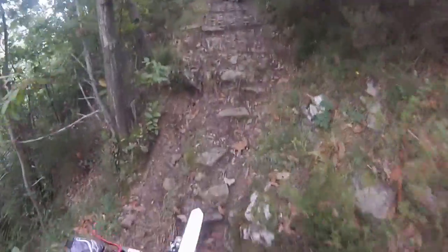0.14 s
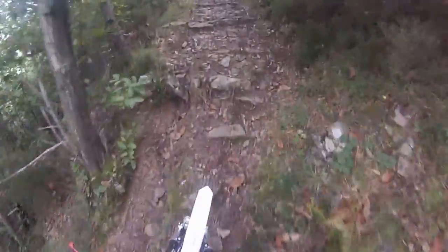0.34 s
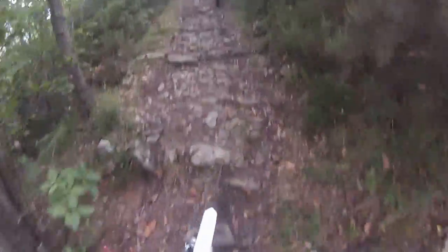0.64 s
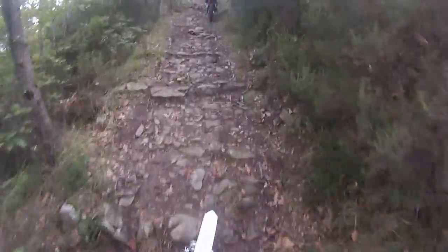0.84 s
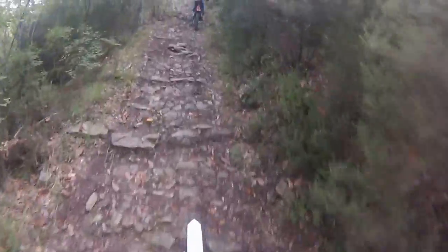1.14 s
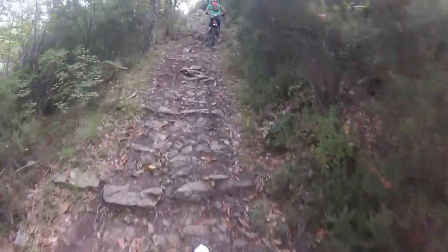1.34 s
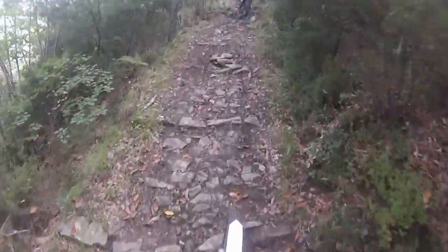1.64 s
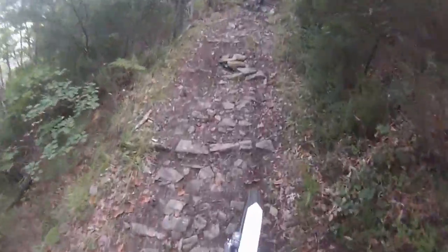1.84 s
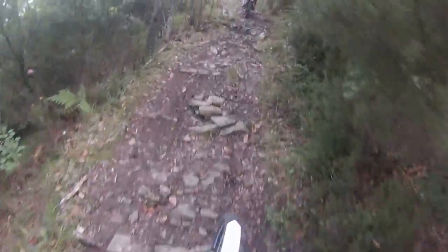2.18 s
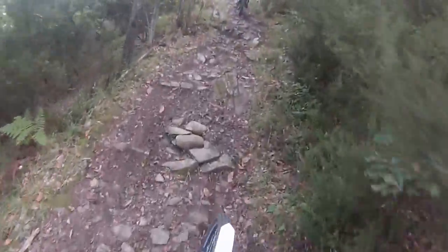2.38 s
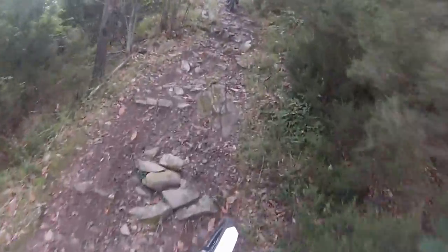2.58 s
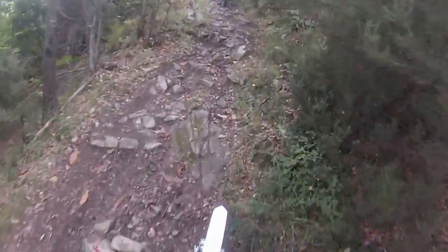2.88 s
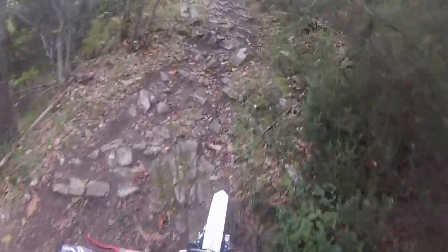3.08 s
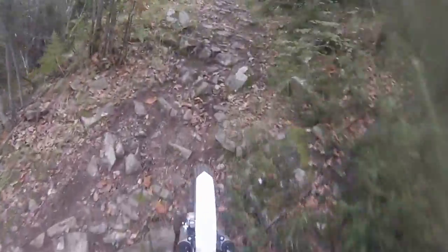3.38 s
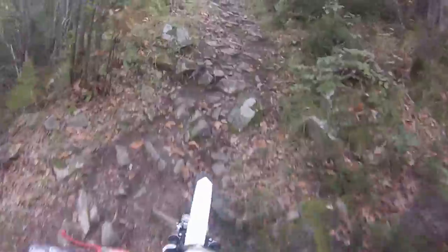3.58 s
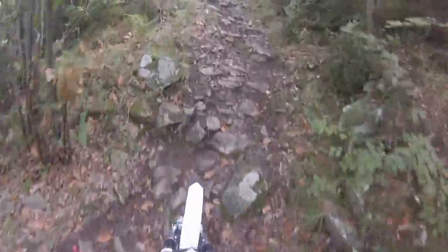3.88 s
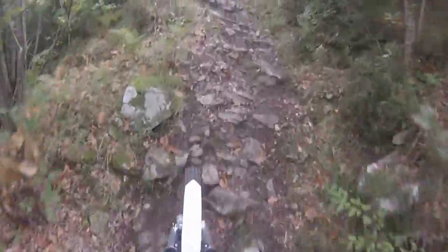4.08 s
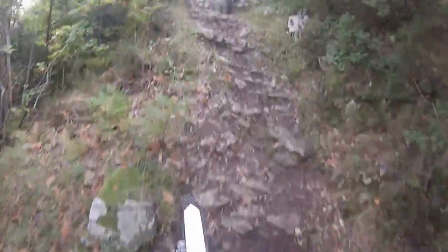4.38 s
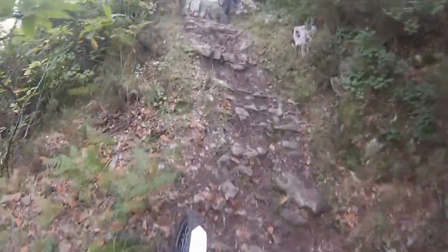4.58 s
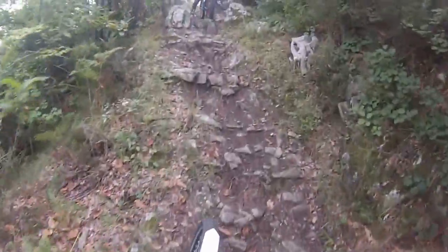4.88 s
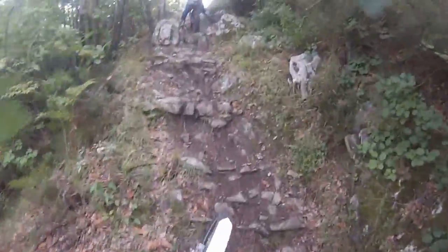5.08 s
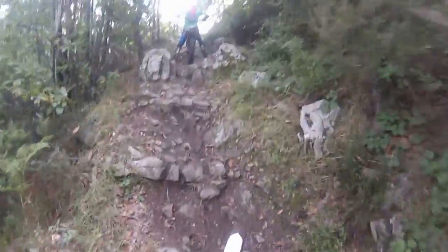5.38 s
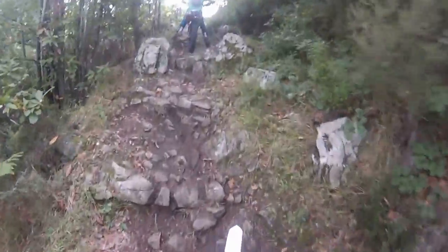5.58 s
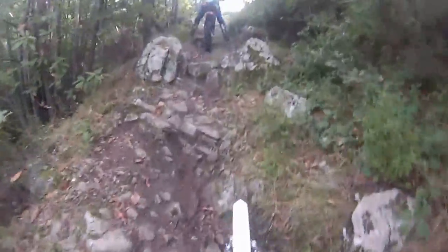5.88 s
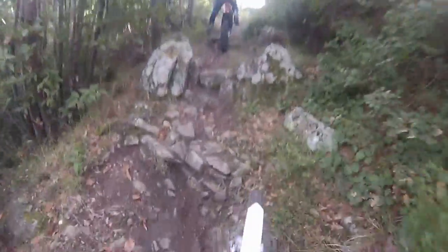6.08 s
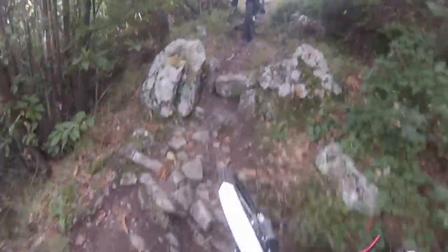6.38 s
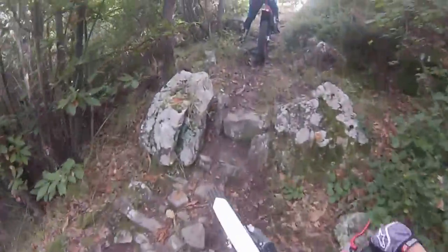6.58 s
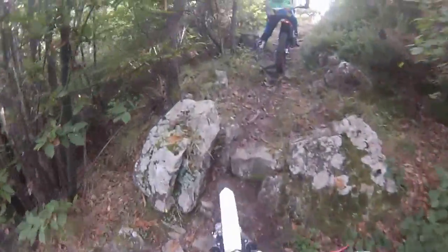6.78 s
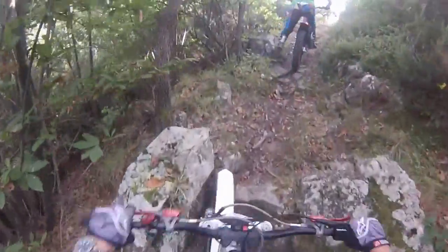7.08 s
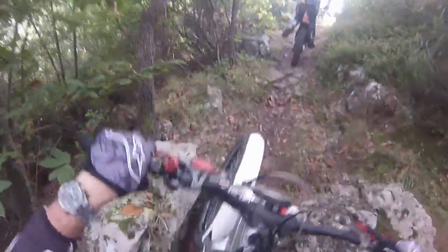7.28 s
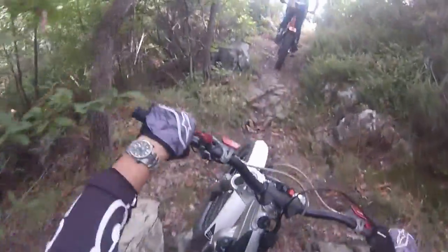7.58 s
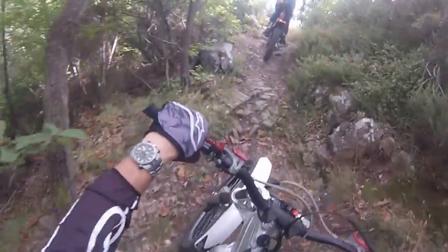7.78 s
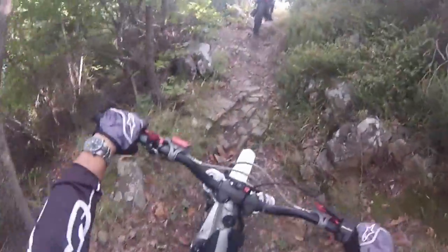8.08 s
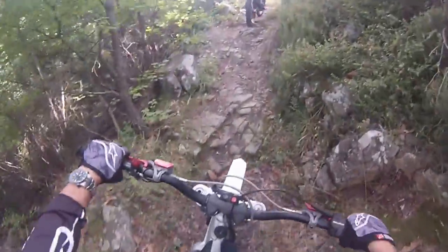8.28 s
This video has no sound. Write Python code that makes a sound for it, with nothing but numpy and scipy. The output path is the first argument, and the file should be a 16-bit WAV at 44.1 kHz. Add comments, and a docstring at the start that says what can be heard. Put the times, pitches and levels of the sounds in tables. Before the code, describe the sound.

An electric bike jolts over a rocky trail with irregular clacks and dull thumps, over a faint motor whine and crunching grit.

```python
"""Hard clacks and dull thumps come first: an electric bike jolts along a rocky forest trail, heard from a
camera in a case on the rider's helmet. Each impact excites damped modes: at a big rock the tyre bumps,
then the bike clacks and the camera mount thuds and sways on; small stones only knock. Stick-slip friction
makes twigs scrape the case and rubber squeak once. The drive whines, hums and ticks in step with its
shaft, while grit crunches and dry leaves hiss under the tyres."""
import sys
import numpy as np
from scipy import signal
from scipy.fft import rfft, irfft
from scipy.io import wavfile
from scipy.ndimage import uniform_filter1d

SR = 44100
rng = np.random.default_rng(int(sys.argv[2]) if len(sys.argv) > 2 else 0)


def persist_wave(psi):
    """Save psi, clipped to +-1, as 16-bit WAV."""
    counts = np.round(np.clip(psi, -1, 1) * 32767).astype(np.int16)
    wavfile.write(sys.argv[1], SR, np.atleast_2d(counts).T)


N = 372204
TIME = np.arange(N) / SR

# Big rocks. Each row: start in seconds, clack level, extra crack and thud level in dB, thud pitch in Hz,
# lead of the tyre bump in seconds, bump level in dB.
BIG_ROCKS = [(0.0946, -27, 4, -18, 144.5, 0.04, -29), (0.2407, -21.5, -28, -16.5, 146, 0.069, -25),
             (0.799, -40.5, -16, -34.5, 143.1, 0.039, -39), (1.2308, -30.5, -21, -22, 124, 0.015, -32),
             (1.8219, -31, -4, -29.5, 133.2, 0.084, -35), (3.4077, -21, -7, -24.5, 141, 0.0081, -33),
             (4.005, -24, -13, -17, 148.1, .04, -22.5), (5.166, -16, -2, -13.5, 146.3, .01, -25.5),
             (5.2855, -31.5, 1, -19.5, 145, .03, -32.5), (5.8345, -23.5, -11, -20.5, 153.3, 0.041, -23.5),
             (5.9882, -29, 0, -19, 148.6, 0.049, -26), (6.1488, -23, -25, -17, 149, 0.049, -19.5),
             (6.5506, -36.5, -20, -25, 120.2, .048, -26), (6.7676, -25.5, -15, -17.5, 132.1, 0.026, -27),
             (7.3212, -21.5, -6, -17.5, 147.1, .03, -27.5), (7.5721, -33.5, -22, -22.5, 119, 0.021, -24),
             (7.6859, -26, 3.5, -19.5, 142.7, .067, -35), (8.1763, -24, -21, -18.5, 140.3, 0.028, -25)]
# Small stones and loose parts. Each row: start in seconds, clack level, extra crack and thud level in dB.
SMALL_KNOCKS = [(0.0834, -31, -30, -36), (0.619, -40.5, -8, -70), (0.7542, -32, -20, -38),
                (1.1646, -25, -12, -35), (1.2146, -21, -24, -45), (1.654, -41.5, -3, -36),
                (2.047, -43.5, -7, -36.5), (3.2605, -33.5, -12, -40), (3.9944, -31.5, -17, -44),
                (4.801, -37.5, -21, -39), (4.9753, -40, 4, -31), (5.1582, -36, -24, -62),
                (5.7846, -33.5, 8, -30.5), (5.942, -32, 4.5, -47), (6.0907, -38.5, -18, -26.5),
                (6.182, -36.5, -19, -27), (6.376, -44, -13, -29), (6.5236, -32.5, -3, -57),
                (6.591, -32.5, -24, -30.5), (6.915, -39.5, -14, -34), (7.1906, -35.5, -23, -33.5),
                (7.44, -52, -18, -32.5), (7.5397, -30.5, -6, -33), (7.619, -31, -3, -40),
                (8.118, -35.5, -27, -44), (8.2909, -37, -17, -40.5), (8.3635, -42, -21, -35),
                (8.4144, -29, -24, -38)]
# Modes of the bike's hard parts. Each row: frequency in Hz, 60 dB decay time in seconds, level in dB.
BIKE_MODES = [(371, 0.032, -5.5), (561, 0.022, -4.5), (717, 0.0094, 1), (1206, 0.022, -1),
              (1353, 0.02, 4.5), (1475, 0.053, -4.5), (2110, 0.012, 10.5), (2300, 0.011, 15.5),
              (2390, 0.022, 6.5), (3095, .012, -3), (3660, 0.01, -1), (3630, 0.016, -14),
              (5400, .01, -18.5), (6600, .01, -27.5)]
# Modes of the mount. Each row: multiple of the thud pitch, 60 dB decay time in seconds, level in dB.
MOUNT_MODES = [(0.479, 0.045, -17), (.78, 0.14, -11.5), (1.026, 0.12, 3.5), (1.218, 0.018, -35.5),
               (1.85, 0.11, -15.5)]
# Sway of helmet and camera. Each row: frequency in Hz, 60 dB decay time in seconds, level in dB.
HELMET_MODES = [(36.84, 0.31, 0.5), (60, 0.16, -13.5)]
# Passing twigs. Each row: start and length in seconds, level in dB, relative ring of the case in dB,
# treble tilt in dB per octave, resonance of the twig in Hz.
TWIG_SCRAPES = [(2.424, 0.034, -43.5, 8, -6.5, 1570), (3.391, 0.021, -26.5, 8, 3.5, 2380),
                (3.414, 0.054, -29.5, -26, -1.5, 2100), (5.209, 0.013, -34.5, -3, -4, 2300),
                (5.255, 0.0008, -27, -23, -4.5, 3050), (5.2798, 0.0029, -32, -1, -12, 1598)]
# Spectrum of a scrape. Each row: frequency in Hz, gain in dB.
SCRAPE_SPECTRUM = [(300, -8), (800, -7), (1500, -3.5), (2900, -1.5), (3600, -2.5), (5200, -0.5),
                   (7000, -2.5), (9000, -7), (12000, -6), (15000, -16)]
# Modes of the camera case. Each row: frequency in Hz, 60 dB decay time in seconds, level in dB.
CASE_WALL_MODES = [(1490, 0.022, 4.5), (2280, 0.017, -24), (2330, 0.015, 5.5), (2980, 0.012, -18),
                   (6150, .05, -31), (6100, 0.005, -9), (6660, 0.024, -2)]
# Loudness of the ground under the tyres. Each row: time in seconds, level in dB.
GROUND_LEVEL = [(0, -59), (.23, -52.5), (.48, -65.5), (.78, -54.5), (1.05, -59), (2.2, -58.5), (2.5, -56.5),
                (2.8, -58), (4.2, -56.5), (4.48, -62), (5.13, -57), (5.42, -67.5), (5.52, -58), (5.8, -58),
                (6.7, -58.5), (6.95, -63.5), (7.27, -55.5), (7.6, -61), (8.12, -51.5), (8.44, -59)]
# Spectrum of the mount's rumble. Each row: frequency in Hz, gain in dB.
RUMBLE_SPECTRUM = [(45, -20), (75, -16), (110, -5.5), (148, 5), (190, -8.5), (260, -4.5), (320, -8),
                   (420, -22), (700, -54)]
# Spectrum of grit and drive ticks. Each row: frequency in Hz, gain in dB.
CRUNCH_SPECTRUM = [(200, -3.5), (380, 1.5), (600, 1), (800, -1.5), (1100, 2.5), (1350, 2), (1570, 5.5),
                   (1850, -8), (2350, 1.5), (2700, -10.5), (3200, -18.5), (4200, -22.5), (7000, -22.5),
                   (15000, -49)]
# Speed of the drive. Each row: time in seconds, shaft turns per second.
SHAFT_SPEED = [(0, 47), (.36, 49.1), (.58, 41.8), (.85, 51), (1.1, 40), (1.4, 38.2), (1.7, 45.8),
               (2.05, 37), (2.33, 41.9), (2.65, 38.2), (2.85, 44.8), (3.1, 48), (3.5, 36.1), (3.85, 43.6),
               (4.25, 42.6), (4.6, 35.5), (5.06, 45.1), (5.38, 30), (5.75, 37.4), (6.5, 33.2), (6.95, 28),
               (7.27, 33.8), (7.5, 30), (7.92, 43.2), (8.44, 37)]
# Transmission through the motor housing. Each row: frequency in Hz, gain in dB.
HOUSING_RESPONSE = [(650, -7), (850, -6.5), (1000, -2.5), (1130, 0), (1400, -3), (1600, -1.5),
                    (1900, -10.5), (2800, -21.5), (3700, -19), (4900, -26.5)]
# Spectrum of dry leaves. Each row: frequency in Hz, gain in dB.
LEAF_SPECTRUM = [(1500, 4), (3000, 6), (3900, -1), (4600, -2.5), (5350, 1.5), (6100, -13), (7100, -2.5),
                 (8500, -14.5), (10000, -13.5), (12500, -10), (15000, -23.5)]
# A thin whistle. Each row: frequency in Hz, rms level in dB.
WHISTLE_TONES = [(10788, -97), (14384, -90)]


def knocks(thud_gain_db=3, contact_s=0.0058):
    """Impact excitation: each blow gives a hard clack and a soft shove that sets the mount ringing."""
    clacks, shoves = np.zeros(N), np.zeros(N)
    sway = ring(HELMET_MODES, size=16384).sum(0)
    for start, clack_db, crack_db, thud_db, sway_db, thud_hz in blows():
        add(clacks, start, undb(clack_db) * clack(crack_db, clack_db))
        thud = ring([(multiple * thud_hz, t60, db) for multiple, t60, db in MOUNT_MODES], size=8192)
        add(shoves, start, undb(thud_db) * thud.sum(0))
        add(shoves, start, undb(thud_db + sway_db) * sway)
    return clacks - undb(thud_gain_db) * signal.fftconvolve(shoves, contact_force(contact_s))[:N]


def blows(pebbles=10, bump_hz=107.5, knock_hz=135.3, soft_crack_db=-18.5):
    """Collisions drive the bike. Each yields start, clack, crack, thud, relative sway and thud pitch."""
    for start, clack_db, crack_db, thud_db, thud_hz, lead_s, bump_db in BIG_ROCKS:
        # the soft tyre meets the rock first and hardly clacks
        yield start - lead_s, bump_db - 14.5, soft_crack_db, bump_db, -2.5, bump_hz
        yield start, clack_db, crack_db, thud_db, 0, thud_hz
    for start, clack_db, crack_db, thud_db in SMALL_KNOCKS:
        yield start, clack_db, crack_db, thud_db, 0, knock_hz
    for _ in range(pebbles):
        pebble_db = -40 - 7 * rng.random()
        yield rng.random() * N / SR, pebble_db, soft_crack_db, pebble_db - 5, 0, knock_hz


def clack(crack_db, blow_db, chatter=0.19, chatter_s=0.0025, size=2048):
    """Modal ringing: hard parts meet and chatter for a few milliseconds, exciting their resonances."""
    t = np.arange(size) / SR
    strike = int(.0009 * SR)
    force = chatter * rng.standard_normal(size) * np.exp(-t / chatter_s) * np.minimum(t * SR / strike, 1)
    force[strike] += 1
    modes = ring(BIKE_MODES, size, detune=.025, scatter_db=2, wave=np.sin)
    mode_hz = np.array(BIKE_MODES)[:, 0]
    # a harder blow is a shorter contact and wakes the highest modes more
    modes[mode_hz > 3000] *= undb(np.clip(.4 * (blow_db + 36), 0, 6))
    high = mode_hz > 1900
    mids, treble = (unit(signal.fftconvolve(force, modes[band].sum(0))[:size]) for band in (~high, high))
    crack = np.hypot(.55, undb(crack_db - 1))  # every contact cracks a little, metal on metal more
    sound = signal.sosfilt(signal.butter(2, 5500, fs=SR, output="sos"), mids - crack * treble)
    return 6 * sound / np.sqrt(np.sum(sound ** 2))  # peak near 1


def scrapes(bend_db_per_s=186, release_s=0.0025, twig_db=-2, twig_t60=0.0045, size=4096):
    """Stick-slip friction: dense clicks ring twig and case, fading as the twig bends away."""
    out, t = np.zeros(N), np.arange(size) / SR
    for start, length, db, case_db, tilt_db, twig_hz in TWIG_SCRAPES:
        pressure = undb(-bend_db_per_s * t) * np.exp(-np.maximum(t - length, 0) / release_s)
        slips = pressure * grains(size, per_s=4700, spread_db=1.5)
        direct = colour(slips, [(hz, level + tilt_db * np.log2(hz)) for hz, level in SCRAPE_SPECTRUM])
        case = signal.fftconvolve(direct, ring(CASE_WALL_MODES, size).sum(0))[:size]
        twig = signal.fftconvolve(direct, ring([(twig_hz, twig_t60, 0)], size)[0])[:size]
        sound = unit(direct) + undb(case_db) * unit(case) + undb(twig_db) * unit(twig)
        add(out, start, undb(db) * unit(sound) * np.sqrt(np.mean(pressure ** 2)))
    return out


def tremble(sway_db=-45.5, rumble_db=-54):
    """Forced vibration: rough ground keeps the helmet swaying and the mount rumbling."""
    sway = signal.fftconvolve(rng.standard_normal(N), ring(HELMET_MODES, size=16384).sum(0))[:N]
    sway = unit(signal.sosfilt(signal.butter(4, 50, fs=SR, output="sos"), sway))
    rumble = unit(colour(grains(N, per_s=310, spread_db=2.5), RUMBLE_SPECTRUM))
    return np.hypot(undb(sway_db), wobble()) * sway + undb(rumble_db + .4 * roughness_db()) * rumble


def wobble(below_thud_db=15, rise_s=0.054, settle_s=0.16):
    """Damping: the extra sway amplitude left by each big rock dies away exponentially."""
    kicks = np.zeros(N)
    for start, _, _, thud_db, *_ in BIG_ROCKS:
        add(kicks, start, undb([thud_db - below_thud_db]))
    settling = signal.lfilter([1], [1, -np.exp(-1 / (settle_s * SR))], kicks)
    return signal.fftconvolve(settling, contact_force(rise_s, size=4096))[:N]


def crunch(grit_db=-4, scuff_db=-25.5, scuff_s=0.037):
    """Granular noise: tiny impacts of grit add up, swelling as the tyre tears it loose at big rocks."""
    grit = unit(colour(grains(N, per_s=6000, spread_db=1.6), CRUNCH_SPECTRUM)) * undb(1.3 * wander(22))
    scuffs, swell = np.zeros(N), np.hanning(int(scuff_s * SR))
    for start, clack_db, *_ in BIG_ROCKS:
        add(scuffs, start - scuff_s / 2, undb(clack_db + scuff_db) * swell)
    return (undb(curve(GROUND_LEVEL) + grit_db) + scuffs) * grit


def ticks(weak_db=-7, swell_s=.0026):
    """Periodic excitation: the drive rattles once a shaft turn, alternately strong and weak."""
    turns_per_s = curve(SHAFT_SPEED)
    turns = np.cumsum(turns_per_s) / SR
    turn = turns.astype(int)
    scatter_db = 2 * np.clip(rng.standard_normal(1024), -2, 2)
    age = (turns % 1) / turns_per_s / swell_s
    envelope = undb(scatter_db[turn] + weak_db * (turn % 2)) * age * np.exp(-age)
    level_db = curve(GROUND_LEVEL) - 1 - .25 * spurt()  # a spurt takes up the slack
    return undb(level_db) * unit(colour(envelope * rng.standard_normal(N), CRUNCH_SPECTRUM))


def whine(teeth=21, throb=0.28, harmonics=5):
    """Gear meshing: the pitch is the rate of tooth contact; bumps and backlash smear it to a whirr."""
    turns_per_s = curve(SHAFT_SPEED)
    level_db = -61.5 + 1.5 * spurt() + .32 * (turns_per_s - 40)
    mesh_hz = teeth * turns_per_s
    unsteady = 1 + .012 * wander(30) + .025 * wander(350)
    phase = 2 * np.pi * np.cumsum(mesh_hz * unsteady) / SR
    hz, db = np.transpose(HOUSING_RESPONSE)
    tone = np.zeros(N)
    for k in range(1, harmonics + 1):
        housing_db = np.interp(np.log(k * mesh_hz), np.log(hz), db)
        backlash = 1.7 * wander(150)
        flutter_db = 2.5 * wander(120)
        tone += undb(housing_db + flutter_db) * np.sin(k * phase + backlash)
    tooth_load = 1 + throb * np.cos(phase / teeth)  # rises and falls once a shaft turn
    return undb(level_db) * tooth_load * tone


def hum(cycles_per_turn=7, backlash_rad=1.64, flutter_db=3):
    """Phase modulation: backlash roughens the tone of the slower gear stage, louder under throttle."""
    hz = cycles_per_turn * curve(SHAFT_SPEED) * (1 + 0.03054 * wander(30))
    phase = 2 * np.pi * np.cumsum(hz) / SR
    level_db = -61.5 + .5 * spurt() + flutter_db * wander(120)
    return undb(level_db) * np.sin(phase + backlash_rad * wander(110))


def squeak(start_s=4.766, length_s=0.0354, start_hz=386, rise_hz=83.6, level_db=-49.5):
    """Stick-slip oscillation: rubber briefly sounds four harmonics that bend upward."""
    along = np.arange(0, 1, 1 / (length_s * SR))
    phase = 2 * np.pi * np.cumsum(start_hz + rise_hz * np.sin(np.pi / 2 * along)) / SR
    tone = sum(undb(-2 * np.log10(k)) * np.sin(k * phase) for k in range(1, 5))
    out = np.zeros(N)
    add(out, start_s, undb(level_db) * np.sin(np.pi * along) * tone)
    return out


def leaves(level_db=-67.5):
    """Incoherent addition: the crackles of dry leaves merge into a hiss, louder on rough ground."""
    hiss = unit(colour(grains(N, per_s=14000, spread_db=1.0), LEAF_SPECTRUM)) * undb(2.8 * wander(35))
    return undb(level_db + .83 * roughness_db()) * hiss


def whistle():
    """Pure tones: two very faint, steady sinusoids near the top of hearing."""
    return sum(np.sqrt(2) * undb(db) * np.sin(2 * np.pi * hz * TIME) for hz, db in WHISTLE_TONES)


def spurt(cruise_s=0.58):
    """Shaft turns per second above the moving average: positive under throttle, negative coasting."""
    turns_per_s = curve(SHAFT_SPEED)
    return turns_per_s - uniform_filter1d(turns_per_s, int(cruise_s * SR))


def roughness_db():
    """Deviation of the ground level from its mean."""
    ground_db = curve(GROUND_LEVEL)
    return ground_db - ground_db.mean()


def ring(modes, size, detune=0, scatter_db=0, wave=np.cos):
    """Free vibration: one damped sinusoid per mode, with optional scatter of pitch and strength."""
    hz, t60, db = np.transpose(modes)[:, :, None]
    pitch, strength = rng.standard_normal((2, len(modes), 1))
    t = np.arange(size) / SR
    envelope = undb(db + scatter_db * strength - 60 * t / t60)
    return envelope * wave(2 * np.pi * hz * (1 + detune * pitch) * t)


def contact_force(seconds, size=512):
    """A smooth pulse of area 1: the longer the contact, the less treble it excites."""
    force = np.sin(np.pi * np.minimum((np.arange(size) + .5) / (seconds * SR), 1)) ** 2
    return force / force.sum()


def grains(size, per_s, spread_db):
    """Shot noise: tiny impacts at random times, most weak and a few strong."""
    hit = rng.random(size) < per_s / SR
    return hit * rng.standard_normal(size) * undb(spread_db * np.minimum(rng.exponential(size=size), 4))


def colour(x, spectrum, size=4096):
    """Minimum-phase filtering by a spectrum of (Hz, dB) points."""
    hz, db = np.transpose(spectrum)
    log_gain = np.log(undb(np.interp(np.log(np.fft.rfftfreq(size, 1 / SR) + 1), np.log(hz), db)))
    cepstrum = irfft(log_gain)[:size // 2]
    cepstrum[1:] *= 2  # folding the cepstrum makes the filter causal
    return signal.fftconvolve(x, irfft(np.exp(rfft(cepstrum, size))))[:len(x)]


def wander(per_s):
    """Random modulation: glides through 1024 Gaussian values, then holds the last."""
    values = rng.standard_normal(1024)
    return np.interp(TIME * per_s, np.arange(len(values)), values)


def curve(table):
    """Linear interpolation of (seconds, value) rows over time."""
    return np.interp(TIME, *np.transpose(table))


def add(track, start_s, sound):
    """Superpose a sound on a track."""
    i = max(int(start_s * SR), 0)
    part = sound[:max(N - i, 0)]
    track[i:i + len(part)] += part


def undb(db):
    """Decibels to amplitude ratio."""
    return 10 ** (np.asarray(db) / 20)


def unit(x):
    """Scale to rms 1."""
    return x / np.sqrt(np.mean(x ** 2) + 1e-18)


def scene():
    """Superposition: twigs, drive, rolling and impacts add in one channel."""
    twigs = scrapes()
    gears = whine() + hum()
    rolling = tremble() + crunch() + leaves()
    return (twigs + gears + rolling + ticks() + knocks() + squeak() + whistle())[None]


def record(dry):
    """Band limiting: the camera drops the deepest bass and cuts the top."""
    sound = signal.sosfilt(signal.butter(1, 12, "high", fs=SR, output="sos"), dry)
    return signal.sosfilt(signal.ellip(10, .2, 80, 15200, fs=SR, output="sos"), sound)


dry = scene()
out = record(dry)
persist_wave(out)
```